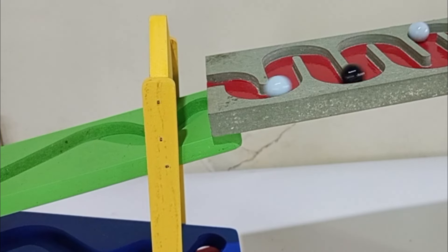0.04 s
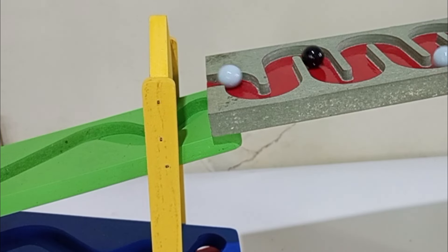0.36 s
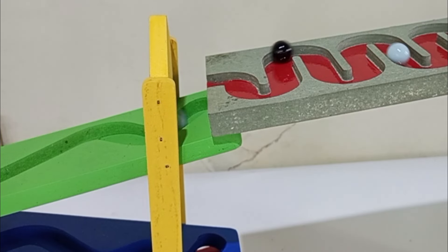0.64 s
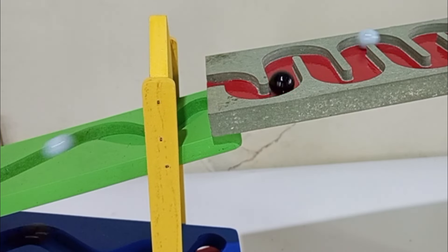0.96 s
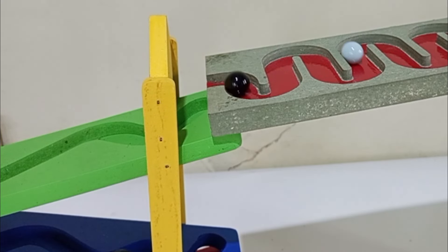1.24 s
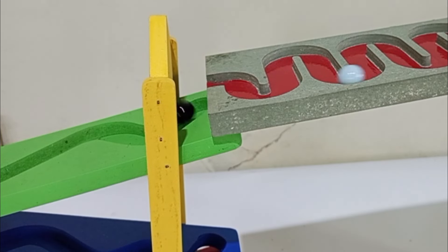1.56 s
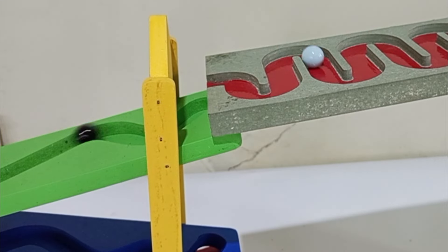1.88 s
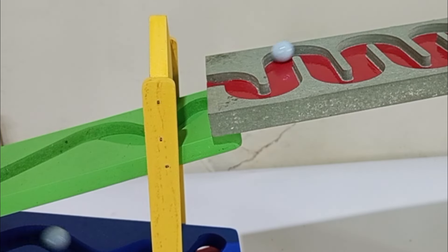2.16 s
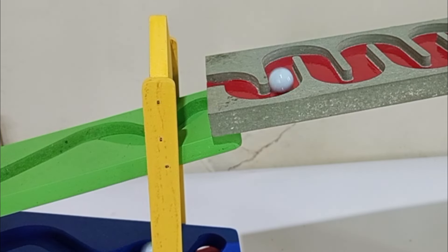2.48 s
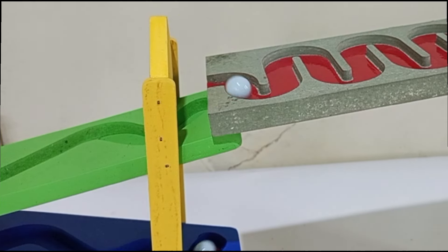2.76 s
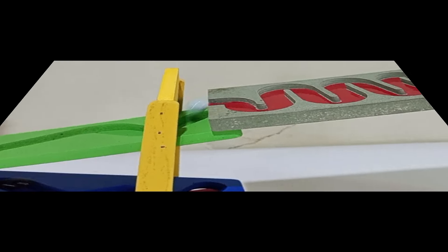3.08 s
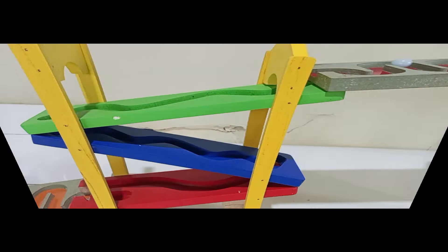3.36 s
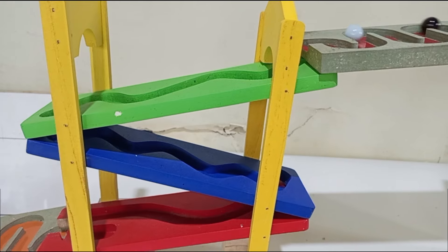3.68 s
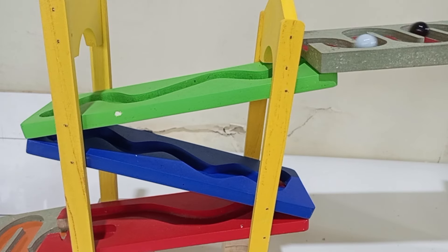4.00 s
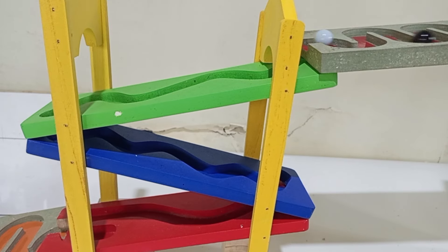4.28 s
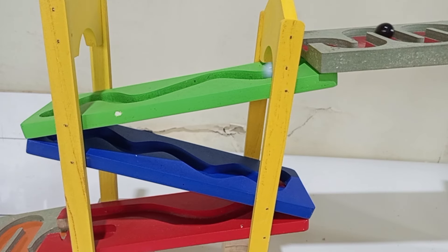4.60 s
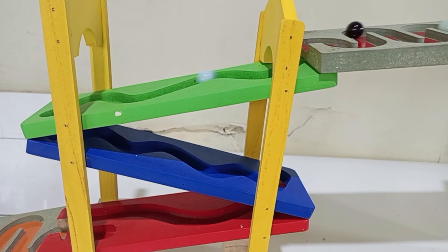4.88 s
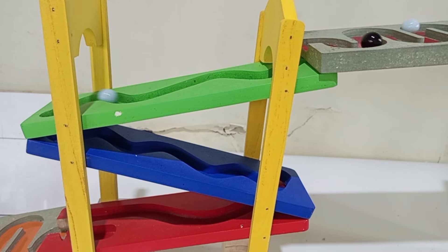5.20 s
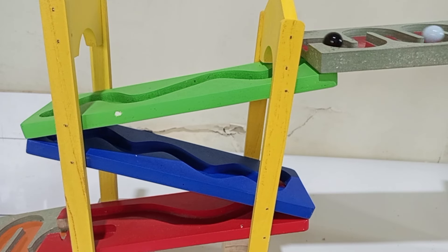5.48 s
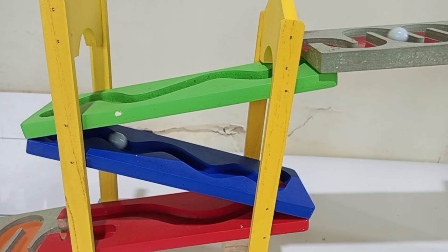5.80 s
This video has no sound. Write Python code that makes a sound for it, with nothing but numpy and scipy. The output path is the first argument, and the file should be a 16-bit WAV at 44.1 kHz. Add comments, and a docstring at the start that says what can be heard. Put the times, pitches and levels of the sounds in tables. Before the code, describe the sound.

Glass marbles roll down a wooden marble run, clacking against the groove walls and dropping from ramp to ramp.

```python
"""Bright clacks and a fine rolling patter: glass marbles run down a wooden tower's zigzag ramps.
They knock on the groove walls and drop from ramp to ramp, ringing the wood; twice a hollow board
rumbles under one, and now and then a rim clonks. Thin ticks and a rustle sit on top, low air and a
faint hum underneath. A bare, hard-walled room answers, and the sound cuts out briefly halfway."""
import sys
import numpy as np
from scipy import signal
from scipy.fft import rfft, irfft
from scipy.io import wavfile
from scipy.ndimage import uniform_filter1d

SR = 44100
rng = np.random.default_rng(int(sys.argv[2]) if len(sys.argv) > 2 else 0)


def transcribe(u):
    """Save the signal u as a 16-bit wav file named by the first command-line argument.

    u: samples, shape (n,) or (channels, n), limited to [-1, 1]; the rate is SR.
    q: integer samples, one column per channel.
    """
    v = np.clip(np.atleast_2d(u).T, -1, 1)
    q = np.round(v * 32767).astype(np.int16)
    wavfile.write(sys.argv[1], SR, q)


N = 266805
TIME = np.arange(N) / SR

# still air of the room: freq_hz, level_db
AIR_COLOUR = [(20, -10.5), (40, -30), (60, 3), (90, 6), (150, 7), (220, -0.5), (400, -7), (900, -16),
              (2000, -22.5), (6000, -27), (8500, -42), (16000, -43)]
# a faint, thin hum: start_s, length_s, level_db
HUM_SWELLS = [(3.45, 0.64, -65.5)]
# tone of the reverb: freq_hz, level_db
REVERB_COLOUR = [(100, 8.5), (300, -0.5), (700, -3), (1500, -5.5), (3200, -1.5), (5500, -3), (9000, -3.5),
                 (16000, -2)]
# decay of the reverb: freq_hz, t60_s
REVERB_DECAY = [(300, 0.5), (1000, 0.68), (2500, 0.49), (5500, 0.42), (11000, 0.57), (16000, 0.21)]

# a bright rustle: start_s, length_s, level_db
RUSTLE_SWELLS = [(4.8, 0.046, -19), (4.88, 0.06, -35.5), (5.19, 0.086, -40.5), (5.33, 0.088, -52)]
# thin, lone ticks: start_s, level_db, tilt_db_per_octave
TICK_HITS = [(2.561, -35, -5), (2.7552, -38, 5), (3.4725, -54, 1.5), (3.7968, -42.5, 6.5),
             (3.856, -46.5, -1), (3.965, -40, 2.5), (4.4625, -34.5, 6), (4.8201, -25.5, 9),
             (4.978, -31.5, 1), (5.0484, -30.5, -4), (5.059, -28, 0.5), (5.1074, -38, 1),
             (5.1928, -29.5, 2), (5.219, -29, 2), (5.2319, -28.5, -3.5), (5.279, -34.5, -3),
             (5.368, -31.5, -5), (5.411, -33, -6), (5.7267, -33.5, 7), (5.9783, -35, 9)]
# tone of the ticks and the rustle: freq_hz, level_db
THIN_COLOUR = [(300, -10.5), (1500, -11), (2800, -9.5), (4300, -0.5), (6300, -0.5), (8500, -14),
               (10800, -7), (13300, -18.5), (15500, -18), (17000, -40)]
# glass meets glass: start_s, level_db
CLINK_HITS = [(3.9648, -38.5)]
# ring of a marble: pitch_hz, level_db, t60_s
GLASS_MODES = [(4800, 0.5, 0.012), (5300, -9, 0.014), (5320, -3, 0.016)]
# a marble strikes a rim: start_s, level_db
RIM_HITS = [(2.4448, -12.5), (2.4757, -19), (2.852, -30), (5.5798, -31), (5.621, -35), (6.0357, -32.5)]
# ring of the rim: pitch_hz, level_db, t60_s
RIM_MODES = [(740, -13, .03), (781, -2.5, 0.032), (990, -16.5, 0.035), (1050, 2.5, 0.036),
             (1119, 5.5, 0.051), (1180, -22, .04), (1400, -8, 0.047)]

# a marble lands or bounces on the hollow board: start_s, boom_db, clack_db, tilt_db_per_octave
BOARD_HITS = [(1.2169, -16, -24, 2), (1.238, -17, -23, -4.5), (1.261, -29, -26.5, -6.5),
              (1.2973, -30, -27.5, -1), (1.3806, -22, -22.5, -0.5), (1.41, -19, -25, 3),
              (2.1334, -16.5, -21.5, -7), (2.1794, -15, -28, 15), (2.191, -20.5, -31.5, 4),
              (2.288, -16.5, -24, -12), (2.3422, -24.5, -28, 8)]
# a marble crosses the board: start_s, length_s, level_db
BOARD_CROSSINGS = [(1.217, 0.34, -26), (2.133, 0.4, -26.5)]
# ring of the board: pitch_hz, level_db, t60_s
BOARD_MODES = [(294, 0.5, .15), (309.3, 0.5, 0.17), (342, 3, 0.083), (386.4, 0.5, 0.18),
               (420.6, 1.5, 0.062), (562, -8, 0.16), (680, -18.5, 0.053), (740, -20.5, 0.16),
               (1010, 0.5, 0.048)]
# tone of the rattle on the board: freq_hz, level_db
RATTLE_COLOUR = [(300, 4.5), (600, 0.5), (1200, 3), (2200, 1), (4000, -8.5), (6300, -8.5), (8500, -23),
                 (10800, -15), (13300, -23), (15500, -24), (17000, -42.5)]

# a marble swings slowly through a bend of the top ramp: start_s, level_db
BENDS = [(3.24, -46), (3.49, -55), (4.32, -45), (5.56, -62)]
# tone of that slow roll: freq_hz, level_db
BEND_COLOUR = [(300, -25), (600, -18.5), (1000, -30.5), (1450, -19.5), (1740, 16), (1980, 3), (2200, 1),
               (2600, -1), (3200, -38.5), (6000, -47.5), (10000, -57.5)]
# a marble runs down a stretch of groove: start_s, length_s, level_db
RUNS = [(-0.1, 1, -34), (0.68, 0.53, -31), (1.27, 0.26, -34.5), (1.7, 0.56, -29.5), (2.28, 0.35, -28),
        (2.66, 0.58, -34), (4.66, 0.27, -30.5), (5.05, 0.42, -34.5), (5.88, 0.14, -38)]
# tone of that fast roll: freq_hz, level_db
RUN_COLOUR = [(150, -16.5), (400, -2), (900, -1), (1400, -0.5), (1800, -1.5), (2300, -2), (3300, 1),
              (5000, -11), (6800, -17), (8500, -34), (16000, -33)]

# ring of a ramp, its six bending modes first: pitch_hz, level_db, t60_s
RAMP_MODES = [(376.6, 0, 0.029), (559, -6.5, 0.071), (711, 0.5, 0.034), (940, 0, 0.044), (1028, 2, 0.016),
              (1296, 4.5, 0.043), (1574, -5.5, 0.043), (1755, 1.5, 0.039), (1944, 1.5, 0.038),
              (2444, -5, 0.029), (2629, 1, 0.033), (2874, -5, 0.028), (3270, -14.5, 0.027),
              (3238, 11.5, 0.012), (3692, 3, 0.018), (3790, 4, 0.019), (4147, 4, 0.025),
              (4600, 6.5, 0.0099), (4930, 6.5, 0.01), (4910, -1.5, 0.0063), (5160, -12.5, 0.0013),
              (5850, -25, 0.0059)]
# the dense, quickly damped rest of the wood: freq_hz, level_db
CRACK_COLOUR = [(200, -17.5), (800, -22.5), (1400, -17.5), (2000, -1.5), (3400, -2.5), (4500, -5),
                (5800, -7), (6700, -14), (7800, -41.5), (16000, -80)]
# tick of the glass contact itself: freq_hz, level_db
CONTACT_COLOUR = [(4000, 5), (7000, 13), (8700, -3), (10600, 6.5), (13300, -9), (15500, -2.5), (17000, -55)]
# a marble strikes a groove wall or another marble: start_s, level_db, tilt_db_per_octave, tick_db
KNOCK_HITS = [(0.0665, -26, -1.5, -24), (0.1128, -24, -1, -29), (0.1332, -32, -3, -23),
              (0.1938, -26, 2.5, -22), (0.2705, -27.5, -4, -30), (0.2937, -32, -5, -24),
              (0.3377, -34.5, -4, -24), (0.4082, -20, -9, -26), (0.4128, -22, 19, -8.5),
              (0.4532, -27, -7, -20), (0.4902, -18, 1, -22), (0.531, -27.5, -9, -17),
              (0.5501, -29.5, -17, -16), (0.6246, -32.5, -7, -42.5), (0.6567, -22.5, 4, -21),
              (0.6955, -23, 2, -38), (0.813, -26, 1, -29), (0.864, -30, -1, -38), (0.9439, -29.5, -2, -30),
              (1.019, -28, -6, -27), (1.049, -27, -13.5, -34), (1.1812, -32.5, -16, -37),
              (1.284, -19, -2, -30), (1.4784, -24, -3, -14), (1.5485, -41, -15, -2),
              (1.6303, -24.5, -2, -13), (1.6359, -19, 5, -22), (1.6763, -22.5, 2, -9.5),
              (1.8209, -18, 8, -24), (1.8287, -16, -2.5, -6.5), (1.8862, -25, -5, -11),
              (1.991, -27, -4, -25), (2.2166, -20.5, -1.5, -21), (2.3835, -25, -2, -23),
              (2.413, -26, -2.5, -38), (2.423, -20, -1.5, -35), (2.5387, -22, 8.5, -17),
              (2.5973, -29, -5, -35), (2.6127, -19.5, -1.5, -19), (2.766, -23, 3, -13),
              (2.7927, -26.5, -4, -14), (2.8194, -30.5, -2, -21), (2.8361, -30, -27, -14),
              (2.952, -25, 3.5, -18), (3.001, -19, 3.5, -7.5), (3.0553, -27.5, -26, -29.5),
              (3.157, -32, -1, -28), (3.2159, -21, 4, -19), (3.4937, -41, -11, -31),
              (3.812, -50.5, -12.5, -2), (3.8828, -49.5, -26, -30), (4.0361, -35, -17.5, -42),
              (4.2851, -34, -11, -24), (4.3449, -26, -25, -30), (4.3872, -35, -31, -50),
              (4.4, -31.5, -4, -25), (4.5714, -36, -8, -43), (4.5955, -35, -13, -21), (4.7594, -26, -5, -9),
              (4.9596, -21, 4, -29), (5.17, -21.5, 1, -14), (5.3389, -28, -3, -10.5),
              (5.3894, -32, -3, -29), (5.533, -24, -12.5, -20), (5.578, -21, -16.5, -28),
              (5.5843, -26, 18.5, -3), (5.619, -23, -24, -14), (5.704, -17, 6, -17),
              (6.018, -26.5, -0.5, -38)]
# a marble drops off the top ramp onto the next: start_s, level_db, tilt_db_per_octave, first_flight_s
DROP_HITS = [(0.6778, -14.5, 5.5, 0.07), (1.6446, -14.5, 6, 0.0742), (4.601, -13, 2.5, 0.0745),
             (5.8637, -15.5, 3, 0.057)]


def undb(db):
    """Decibels to gain."""
    return 10 ** (np.asarray(db) / 20)


def unit(x):
    """Scale to an rms of 1."""
    return x / np.sqrt(np.mean(x ** 2))


def unit_hit(x):
    """Scale a hit to an rms of 1 over its first 10 ms."""
    return x / np.sqrt(np.mean(x[:SR // 100] ** 2))


def curve_at(points, hz):
    """Read (freq_hz, value) points on a log-frequency axis."""
    freqs, values = np.transpose(points)
    return np.interp(np.log(np.maximum(hz, 1)), np.log(freqs), values)


def colour(x, points, tilt=0):
    """Causal EQ through (freq_hz, level_db) points, tilted in dB per octave from 1.5 to 12 kHz."""
    size = 1024
    hz = np.arange(size // 2 + 1) * SR / size
    octaves = np.log2(np.clip(hz, 1500, 12000) / 3000)
    cepstrum = irfft(np.log(undb(curve_at(points, hz) + tilt * octaves)))
    cepstrum[1:size // 2] *= 2  # fold to minimum phase, so attacks stay crisp
    cepstrum[size // 2 + 1:] = 0
    return signal.fftconvolve(x, irfft(np.exp(rfft(cepstrum))))[:len(x)]


def add(out, start_s, x):
    """Mix a sound in at start_s."""
    i = max(int(start_s * SR), 0)
    out[i:i + len(x)] += x[:len(out) - i]


def waver(samples):
    """Smooth random drift with an rms of 1, turning over about this many samples."""
    return unit(uniform_filter1d(uniform_filter1d(rng.standard_normal(N), samples), samples))


def swells(rows, attack_s, release_s, fade_db_per_s=0):
    """Envelope of (start_s, length_s, level_db) rows: each rises, holds or fades, then dies away."""
    power = np.zeros(N)
    for start_s, length_s, db in rows:
        age = TIME[:SR] + max(-start_s, 0)
        attack = np.minimum(age / attack_s, 1)
        release = np.exp(-np.maximum(age - length_s, 0) / release_s)
        add(power, start_s, (attack * undb(db - fade_db_per_s * age) * release) ** 2)
    return np.sqrt(power)


def strike(modes, spread_db, detune, tilt=0, contact_s=0.00026):
    """Struck modes: the place of the blow sets each one's sign and share; contact rounds the attack."""
    hz, db, t60 = np.transpose(modes)
    share, shift, side = rng.standard_normal((3, len(hz)))
    gains = np.sign(side) * undb(db + spread_db * share + tilt * np.log2(hz / hz[0]))
    t = TIME[:int(t60.max() * SR)]
    tones = np.sin(2 * np.pi * np.outer(hz * (1 + detune * shift), t))
    decays = np.exp(-np.log(1000) * np.outer(1 / t60, t))
    attack = 1 - np.exp(-t / contact_s)
    return unit_hit((gains @ (tones * decays)) * attack)


def burst(points, decay_s, tilt=0):
    """A snap of coloured noise that dies within milliseconds."""
    t = TIME[:SR // 20]
    snap = rng.standard_normal(len(t)) * np.exp(-t / decay_s)
    return unit_hit(colour(snap, points, tilt))


def grains(per_s, spread_db):
    """Tiny impacts at random times; a higher spread makes a few stand out."""
    lands = rng.random(N) < per_s / SR
    size = np.minimum(rng.exponential(size=N), 4)
    return unit(lands * rng.standard_normal(N) * undb(spread_db * size))


def air(level_db=-53):
    """A low, even bed of room tone."""
    hz = np.arange(N // 2 + 1) * SR / N
    spectrum = rfft(rng.standard_normal(N)) * undb(curve_at(AIR_COLOUR, hz))
    return undb(level_db) * unit(irfft(spectrum, N))


def hum(pitch_hz=840, waver_db=2):
    """A faint, wavering tone that creeps in once and goes."""
    tone = unit(np.sin(2 * np.pi * pitch_hz * TIME)) * undb(waver_db * waver(samples=1500))
    return tone * swells(HUM_SWELLS, attack_s=0.57, release_s=0.06)


def reverb(x, wet_db=-8, first_wall_s=0.012, near_db=-9):
    """Near surfaces answer faintly at once; the walls follow with a long, dense tail."""
    t, hz = TIME[:SR], np.arange(SR // 2 + 1)
    spectrum = rfft(rng.standard_normal(SR))
    centres_hz = np.geomspace(250, 16000, 7)
    tail = np.zeros(SR)
    for centre_hz, weights in zip(centres_hz, np.eye(len(centres_hz))):
        band = irfft(spectrum * curve_at(np.c_[centres_hz, weights], hz), SR)
        tail += band * np.exp(-np.log(1000) * t / curve_at(REVERB_DECAY, centre_hz))
    tail[t < first_wall_s] *= undb(near_db)
    response = colour(tail / np.linalg.norm(tail), REVERB_COLOUR)
    return undb(wet_db) * signal.fftconvolve(x, response)[:len(x)]


def rustle(trim_db=-1):
    """A crowd of tiny ticks blurs into a bright rustle."""
    envelope = swells(RUSTLE_SWELLS, attack_s=0.01, release_s=0.005, fade_db_per_s=50)
    return unit(colour(grains(per_s=4900, spread_db=1), THIN_COLOUR)) * envelope * undb(trim_db)


def ticks(trim_db=-1):
    """Lone, thin ticks, each a bright snap of noise."""
    out = np.zeros(N)
    for start_s, db, tilt in TICK_HITS:
        add(out, start_s, undb(db + trim_db) * burst(THIN_COLOUR, decay_s=0.0035, tilt=tilt))
    return out


def clink():
    """Glass meets glass with a tiny, high ring."""
    out = np.zeros(N)
    for start_s, db in CLINK_HITS:
        add(out, start_s, undb(db) * strike(GLASS_MODES, spread_db=1, detune=0.004))
    return out


def rim(ring_db=-1, clack_db=-5.5):
    """A marble hits a rim, which rings with a hollow clonk."""
    out = np.zeros(N)
    for start_s, db in RIM_HITS:
        add(out, start_s, undb(db + ring_db) * strike(RIM_MODES, spread_db=1, detune=0.0025))
        add(out, start_s, undb(db + clack_db) * clack(tilt=-7, thud_db=-4, tick_db=-12))
    return out


def hollow_board(boom_trim_db=-8.5, rumble_db=-5, rattle_db=-4, waver_db=1.5):
    """Marbles bounce on a thin board, then rumble and rattle across it."""
    # the rumble builds sooner than the rattle and fades faster as the marble settles
    rumble_swell = swells(BOARD_CROSSINGS, attack_s=0.025, release_s=0.14, fade_db_per_s=60)
    rattle_swell = swells(BOARD_CROSSINGS, attack_s=0.041, release_s=0.099, fade_db_per_s=15.5)
    ring = strike(BOARD_MODES, spread_db=0, detune=0)
    rumble = unit(signal.fftconvolve(grains(per_s=900, spread_db=-2), ring)[:N])
    rattle = unit(colour(grains(per_s=800, spread_db=2.5), RATTLE_COLOUR))
    out = rumble * rumble_swell * undb(rumble_db)
    out += rattle * rattle_swell * undb(rattle_db + waver_db * waver(samples=400))
    for start_s, boom_db, clack_db, tilt in BOARD_HITS:
        boom = strike(BOARD_MODES, spread_db=2.5, detune=0.0048)
        add(out, start_s, undb(boom_db + boom_trim_db) * boom)
        add(out, start_s, undb(clack_db) * clack(tilt, thud_db=-4, tick_db=-12))
    return out


def run_envelope():
    """A roll swells as the marble settles, fades as it runs off and stops at the end of the stretch."""
    return swells(RUNS, attack_s=0.13, release_s=0.029, fade_db_per_s=13.5)


def rolling(run_db=-6, bend_s=0.074, creep_db=-76, waver_db=2):
    """Marbles patter over the grain of the grooves, pressing harder and softer through the bends."""
    bends = swells([(start_s, bend_s, db) for start_s, db in BENDS], attack_s=0.048, release_s=0.034)
    bends += undb(creep_db)  # slow rolling between the bends
    fast = unit(colour(grains(per_s=1800, spread_db=1.5), RUN_COLOUR)) * run_envelope() * undb(run_db)
    slow = unit(colour(grains(per_s=430, spread_db=5.5), BEND_COLOUR)) * bends
    return (fast + slow) * undb(waver_db * waver(samples=1200))


def taps(tap_db=-6, scatter_db=2, places=3, taps_per_place=20):
    """A marble brushes the walls at random, as strongly as it rolls; each place has its own clack."""
    out, effort = np.zeros(N), run_envelope()
    for _ in range(places):
        tap = clack(tilt=-5, thud_db=-3, tick_db=-32)
        for slot in range(taps_per_place):
            i = int((slot + rng.random()) * N / taps_per_place)
            gain = effort[i] * undb(tap_db + scatter_db * rng.standard_normal())
            add(out, TIME[i], gain * tap)
    return out


def clack(tilt, thud_db, tick_db, ring_db=-3, crack_db=-5):
    """Glass on wood: upper modes ring, the wood cracks, the plank bends with a thud, the glass ticks."""
    out = np.zeros(SR // 10)
    bending, upper = RAMP_MODES[:6], RAMP_MODES[6:]
    add(out, 0, undb(ring_db) * strike(upper, spread_db=4, detune=0.026, tilt=tilt, contact_s=0.0006))
    add(out, 0, undb(crack_db) * burst(CRACK_COLOUR, decay_s=0.004, tilt=tilt))
    add(out, 0, undb(thud_db) * strike(bending, spread_db=1.5, detune=0.07, contact_s=0.00089))
    add(out, 0, undb(tick_db) * burst(CONTACT_COLOUR, decay_s=0.0038))
    return out


def knocks(tick_trim_db=-3):
    """Marbles strike the groove walls and each other; a harder contact is brighter."""
    out = np.zeros(N)
    for start_s, db, tilt, tick_db in KNOCK_HITS:
        add(out, start_s, undb(db) * clack(tilt, thud_db=-12, tick_db=tick_db + tick_trim_db))
    return out


def drops(landings=4, loss_db=6, dulling_db_per_octave=2.5, flight_shrink_s=0.027):
    """A dropped marble lands hard; every bounce is weaker, duller and sooner than the one before."""
    out = np.zeros(N)
    for start_s, db, tilt, first_flight_s in DROP_HITS:
        for bounce in range(landings):
            hit = clack(tilt - bounce * dulling_db_per_octave, thud_db=-12, tick_db=-21)
            add(out, start_s, undb(db - bounce * loss_db) * hit)
            start_s += first_flight_s - bounce * flight_shrink_s
    return out


def radiate(x, cutoff_hz, order):
    """Low cut: a small plate hardly moves the air below its lowest mode."""
    return signal.sosfilt(signal.butter(order, cutoff_hz, "high", fs=SR, output="sos"), x + 1e-18)


def tower():
    """All that sounds on the tower, as it radiates in one direction."""
    ramps = drops() + knocks() + clink() + taps() + rolling() + rustle() + ticks()
    hollows = hollow_board() + rim()
    return radiate(ramps, cutoff_hz=306, order=2) + radiate(hollows, cutoff_hz=278, order=8)


def scene(gap_start_s=3.277, gap_end_s=3.313):
    """The tower in its room; everything cuts out for a moment halfway, reverb tail included."""
    # each side of the tower radiates its own mix of modes; only the front is heard directly
    front, left, right = tower(), tower(), tower()
    background = air() + hum()
    out = np.zeros(N)
    for stretch in (TIME < gap_start_s, TIME > gap_end_s):
        wet = sum(reverb(side[stretch]) for side in (front, left, right))
        out[stretch] = front[stretch] + wet + background[stretch]
    return out[None]


def record(dry, ceiling=0.88, top_hz=16100):
    """Soft saturation rounds the sharpest peaks; a steep high cut trims the top."""
    rounded = ceiling * np.tanh(dry / ceiling)
    return signal.sosfilt(signal.ellip(8, .2, 70, top_hz, fs=SR, output="sos"), rounded)


dry = scene()
out = record(dry)
transcribe(out)
```